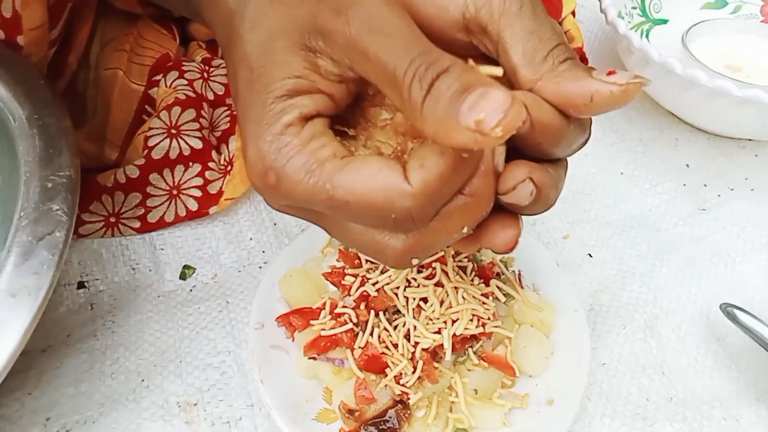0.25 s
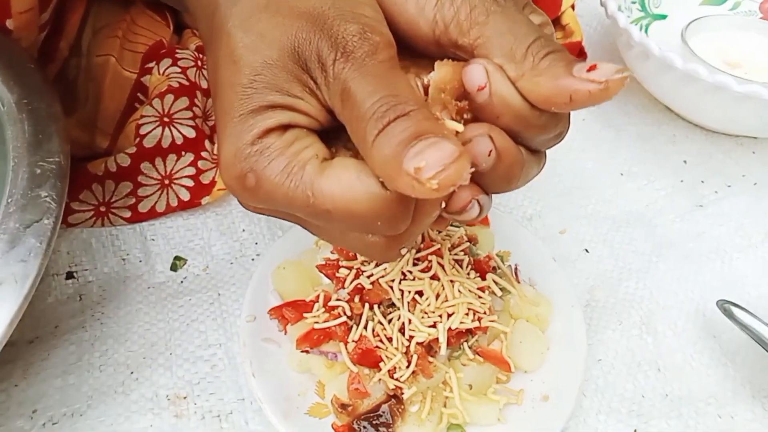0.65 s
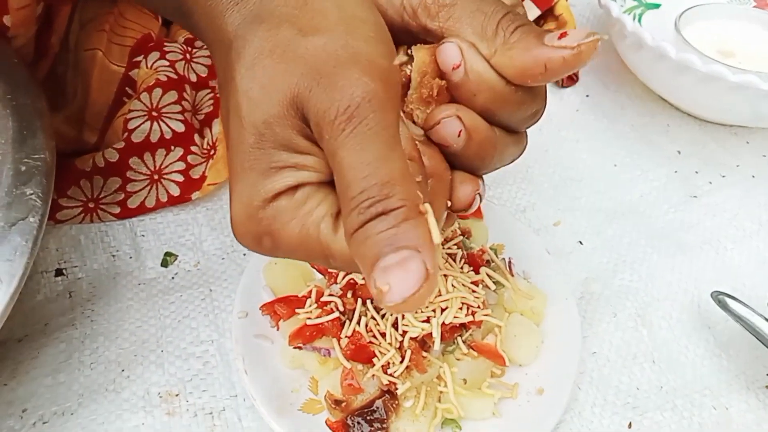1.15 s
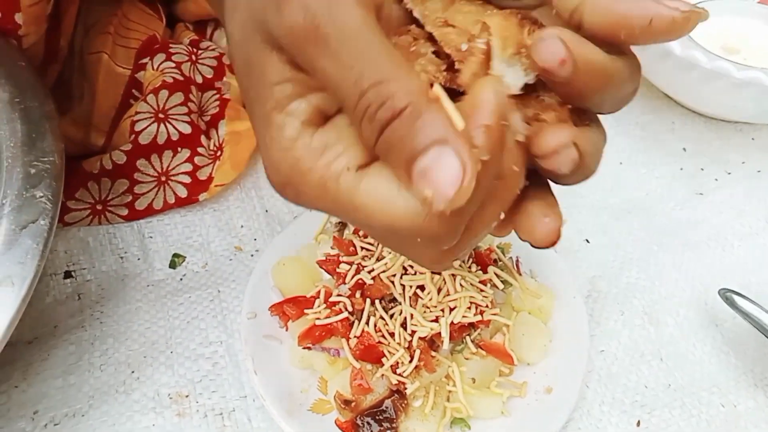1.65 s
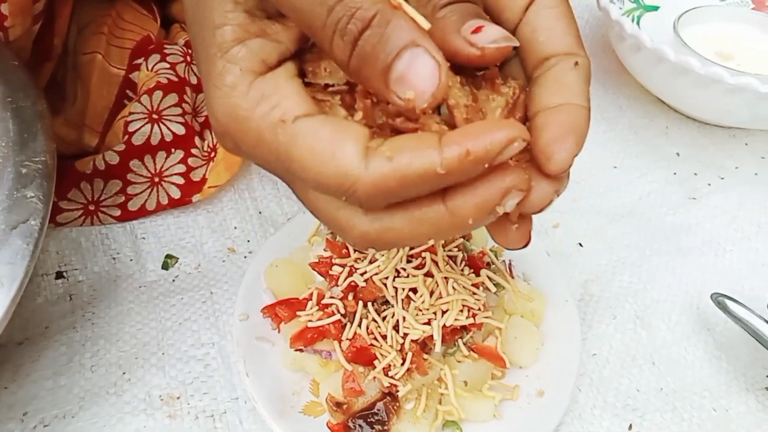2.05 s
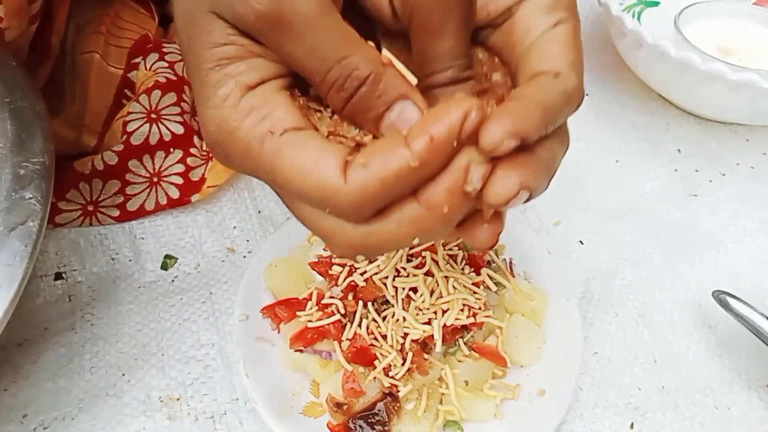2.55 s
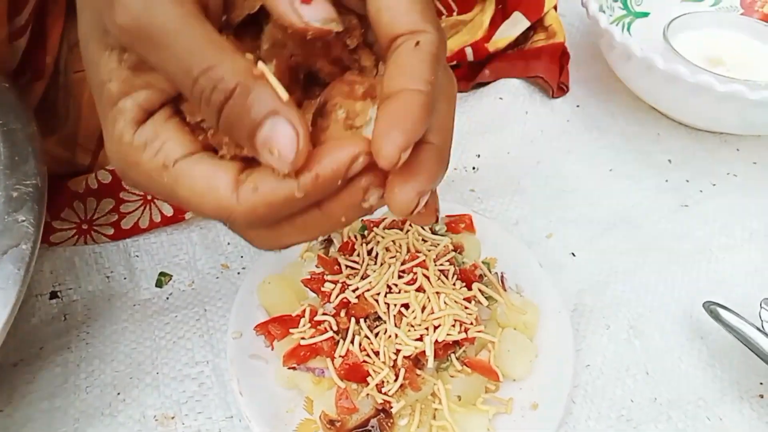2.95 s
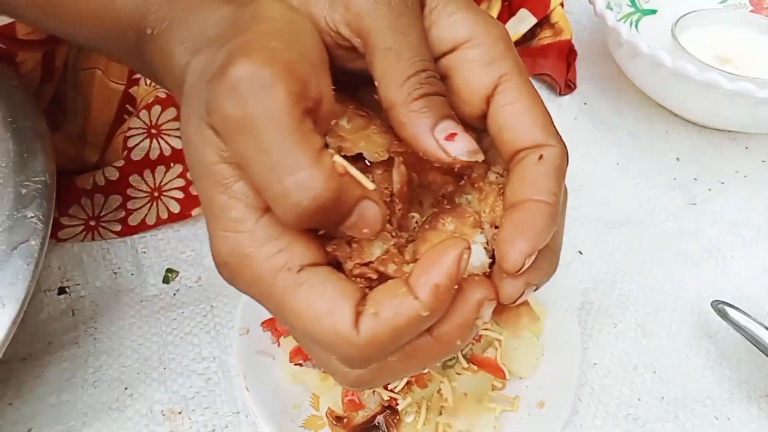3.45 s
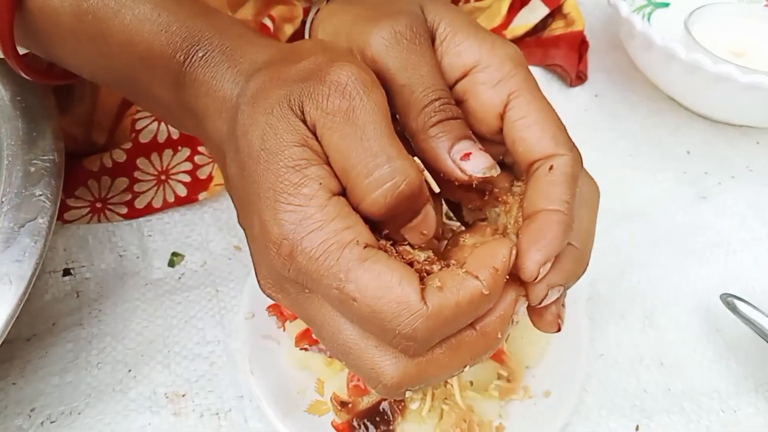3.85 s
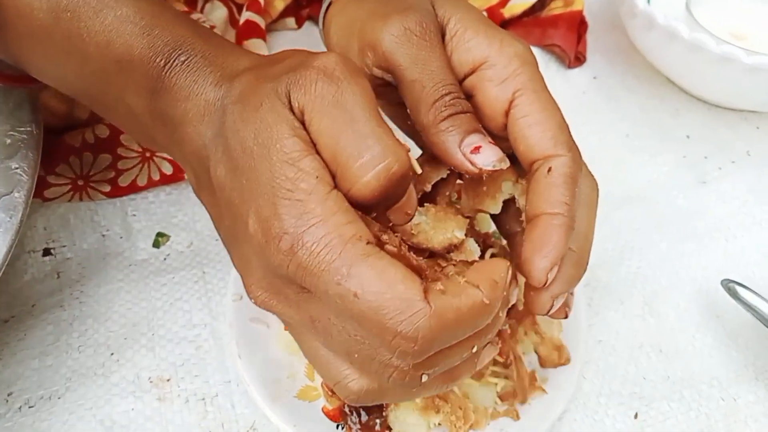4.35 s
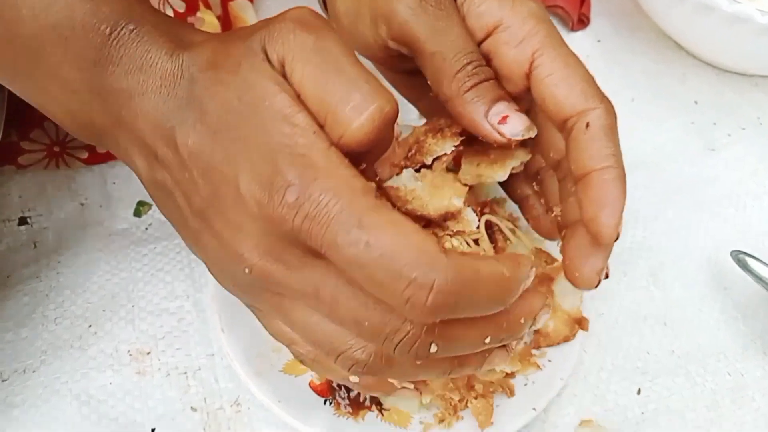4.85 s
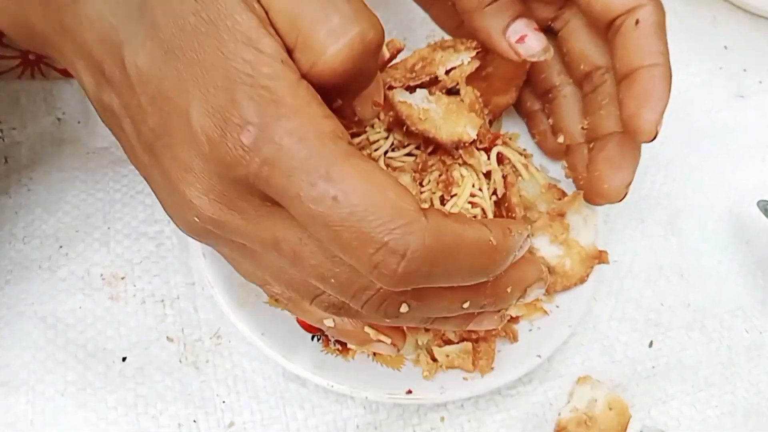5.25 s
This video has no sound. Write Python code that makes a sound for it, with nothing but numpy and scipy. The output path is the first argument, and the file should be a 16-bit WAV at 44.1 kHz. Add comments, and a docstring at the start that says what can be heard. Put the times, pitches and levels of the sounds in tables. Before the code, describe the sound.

Very close, dry crunching of thin fried crackers in cupped hands: clusters of sharp snaps over dense crumb crackle for under three seconds. Then near quiet, with light hard clinks, a few pieces dropping softly on food, and a bird whistling outside. Small quiet room, faint air noise.

```python
"""Crackers crushed by hand

Crisp fried crackers are crushed in cupped hands over a plate of food, close by in a small kitchen.
Each squeeze gives sharp cracks (noise bursts through shell, air and crust filters) over a dense crackle of
crumbs (random clicks that rattle and ring); then the pieces are let fall. A small hard thing,
likely a bangle, clinks as a sum of damped modes; a bird outside whistles gliding near-sines.
Room air and a far hum, both filtered noise, lie beneath."""
import sys
import numpy as np
from scipy import signal
from scipy.fft import rfft, irfft
from scipy.io import wavfile
from scipy.ndimage import uniform_filter1d

SR = 44100
rng = np.random.default_rng(int(sys.argv[2]) if len(sys.argv) > 2 else 0)


def waveform_to_disk(signal):
    """Save audio, clipped to [-1, 1], as 16-bit WAV at the path in sys.argv[1]."""
    frames = np.transpose(np.atleast_2d(signal))
    scaled = np.clip(frames, -1, 1) * 32767
    samples = np.round(scaled).astype(np.int16)
    wavfile.write(sys.argv[1], SR, samples)


N = 242991

# colour as the grip changes and the crumb pitch rises and falls, before each source's own offsets:
# t/s, hollow level/dB, fizz level/dB, sparkle level above 11.5 kHz/dB, crumb pitch f/Hz
GRIP = [(0, -10, -9.5, -4, 3976), (.5, -9, -10.5, 0.5, 3922), (1.35, -7, -13, -8, 3710),
        (1.63, -13.5, -18, 11, 3964), (1.902, -11.5, -8, -27.5, 4160), (2.3, -16.5, -7, -15, 4842),
        (3, -14.5, -12.5, 2.5, 5260), (3.8, -13.5, -11.5, -7, 5660), (4.6, -9, -12, 4, 3750),
        (5.5, -23.5, -13.5, -14, 4705)]
# the three voices of a fracture, air cupped in the hands, the thin shell, the splitting crust: f/Hz, level/dB
HOLLOW = [(60, -47), (200, -25), (450, -21.5), (650, -15.5), (810, -13.5), (1020, -9), (1420, 5.5),
          (1850, -1.5), (2230, 6), (2650, -3.5), (3400, -20)]
SHELL = [(1500, -46), (2600, -19.5), (3050, -1), (3500, 5.5), (4500, 0.5), (5600, 0.5), (6600, -3),
         (7600, -15), (11000, -50)]
FIZZ = [(4000, -26), (6800, 1.5), (7600, 3), (9300, 3), (12000, -3), (15500, -3.5)]


def cracks(snap=0.22, ragged_db=1.0, flake_width_hz=420, flake_ring=3.5, scatter=.16, rise_s=0.00021,
           run_up=0.37, run_up_t60=0.0092, hollow_db=-2.5, fizz_db=-2.0, size=2048, lead_size=256):
    """Brittle fracture: a crack creeps, snaps and runs on raggedly, exciting a few short modes of each flake."""
    # single cracks, loud and faint, falling pieces and hard ticks:
    # t/s, shell level/dB, hollow level re shell before the common offset/dB, t60/s
    crack_rows = [(0.0548, -29.5, -11.5, 0.041), (.078, -21.5, -12.5, 0.013), (.173, -39, -2, .008),
                  (0.2387, -41, 5.5, 0.058), (0.3884, -23, -19, 0.036), (0.3971, -24.5, -6.5, 0.008),
                  (0.4447, -23, -29, .008), (0.4711, -17, -25, 0.0056), (0.4879, -25, -16, 0.027),
                  (0.5089, -19, -17.5, 0.015), (.53, -20, -7.5, .025), (0.5929, -24.5, -7, .029),
                  (0.602, -18.5, -19, 0.012), (0.6112, -16.5, -9.5, 0.039), (0.6202, -25, -10, 0.017),
                  (.639, -15.5, -3.5, 0.013), (0.6863, -26, -7, 0.011), (.71, -28, -0.5, 0.013),
                  (0.7212, -20.5, -8.5, .021), (0.7297, -26, -7, 0.014), (0.7494, -18.5, -1.5, 0.015),
                  (.7779, -23, -5.5, 0.032), (.913, -25.5, -8, .013), (.9528, -21.5, -4, .022),
                  (1.0498, -15.5, -3.5, 0.0099), (1.1829, -29, -3, 0.036), (1.1918, -28, -3, 0.0053),
                  (1.227, -32.5, -4, .025), (1.2406, -24.5, -2, 0.067), (1.2982, -35.5, 7.5, 0.025),
                  (1.319, -30.5, -8, 0.017), (1.3592, -25, -3, 0.0082), (1.3699, -12, -3, 0.024),
                  (1.379, -17.5, -13, 0.025), (1.4249, -28.5, -7.5, 0.0074), (1.4674, -36.5, -16, 0.003),
                  (1.6061, -27, -5, 0.011), (1.6507, -19.5, -5.5, .024), (1.6696, -26.5, -6, 0.0089),
                  (1.7186, -36, -8, 0.014), (2.0843, -47.5, -35, 0.0082), (2.1808, -30, -24.5, 0.061),
                  (2.228, -21, -23.5, 0.012), (2.2676, -27, -24, 0.0064), (2.2812, -25.5, -22, 0.017),
                  (2.2925, -27, -17, .017), (2.3421, -23, -23, 0.011), (2.3602, -20, -13.5, 0.017),
                  (2.4029, -14.5, -25.5, 0.0077), (2.4465, -23, -18.5, 0.0098), (2.4527, -26.5, -16, .012),
                  (2.465, -21, -28, 0.046), (2.4816, -30, -20, 0.0095), (2.5038, -27, -17.5, 0.011),
                  (2.5426, -21.5, -16, 0.02), (2.5784, -28.5, -18, .034), (2.5891, -27, -25, 0.011),
                  (2.6501, -27.5, -11.5, 0.0057), (2.6674, -26.5, -9.5, 0.013), (2.69, -16, -14.5, 0.0066),
                  (2.72, -28.5, -9.5, 0.014), (2.805, -33.5, -32, 0.0048), (3.2194, -35, -13, 0.012),
                  (3.8818, -32.5, -16, 0.0031), (4.1889, -30.5, -29, 0.015), (4.025, -45, -28, 0.0075),
                  (4.5977, -47, -22, .013), (4.631, -45.5, -22, 0.018), (4.9042, -42, -4.5, 0.017),
                  (4.9094, -41, -10, 0.011), (5.132, -41.5, -7.5, 0.046), (5.1413, -29, -31, 0.036)]
    # flakes ring near the pitch of the crumbs; bigger ones sound hollower and lower
    flake_ratio, flake_octaves_per_db = 0.97, .009
    # hard cracks also thump the air in the hands, the more so the harder they are
    thump_hz, thump_width_hz, thump_db, hard_db, thump_growth = 765, 257, -19, -13, 1
    out = np.zeros(N)
    voices = [response(v) for v in (SHELL, HOLLOW, FIZZ)]
    grip = np.transpose(GRIP)
    span = np.sqrt(.007 * SR)   # a level of 0 dB stands for the energy of 7 ms at unit power
    opening = 1 - np.exp(-np.arange(size) / SR / rise_s)
    for s, db, hollow, t60 in crack_rows:
        fizz = np.interp(s, grip[0], grip[2])
        top = np.interp(s, grip[0], grip[3])
        hz = flake_ratio * np.interp(s, grip[0], grip[-1]) * 2 ** (-flake_octaves_per_db * hollow)

        # micro-fractures: a new random level every 32 samples
        ragged = from_db(ragged_db * np.repeat(rng.standard_normal(size // 32), 32))
        force = rms_one(dying_noise(t60, size) * ragged * opening) / np.sqrt(size)
        force[0] += snap * rng.choice([-1, 1])
        creep = run_up * dying_noise(run_up_t60, lead_size)[::-1]   # the crust begins to give just before it breaks
        fracture = np.concatenate([creep, force])

        shell, cavity, crust = [through(fracture, v) for v in voices]
        modes_hz = hz * np.exp(scatter * np.array([-1, 0, 2]) * (.5 + rng.random(size=3)))
        shell = shell + flake_ring * sum(resonance(shell, f, flake_width_hz) for f in modes_hz)
        sound = rms_one(shell) + from_db(hollow + hollow_db) * rms_one(cavity)
        sound = sound + from_db(fizz + fizz_db) * sparkle(crust, top)
        thump = rms_one(twice_resonant(cavity, thump_hz, thump_width_hz))
        sound = sound + from_db(hollow + thump_db + thump_growth * (db - hard_db)) * thump
        add(out, s - lead_size / SR, from_db(db) * span * sound / np.sqrt(len(sound)))
    return out


def crumbs():
    """Superposed crackling noise: dense fine crumbs and sparser coarse snaps, both driven by the squeezes."""
    fine_gain, coarse_gain = squeezing()
    # the fingers damp each crumb, so its ring stays broad
    fine = crackle(per_s=560, spread_db=2.5, grain_t60=0.013, crumb_ring=1.8, crumb_width_hz=320,
                   pitch_spread=.2, rub=0.15, even_s=0.044, shell_db=-1.5, hollow_db=-2.5, fizz_db=-1.0)
    coarse = crackle(per_s=130, spread_db=2.5, grain_t60=0.0088, crumb_ring=3.1, crumb_width_hz=610,
                     pitch_spread=.22, rub=0.14, even_s=.04, shell_db=0.5, hollow_db=-1.0, fizz_db=0.0)
    return fine_gain * fine + coarse_gain * coarse


def squeezing(tighten_db_per_s=465, relax_db_per_s=575):
    """Power addition: each squeeze tightens, holds and relaxes, giving gains of fine crumbs and coarse snaps."""
    # squeezes and rubs of the fingers:
    # start t/s, length/s, level halfway/dB, growth over the length/dB, power share of coarse snaps [0-1]
    squeezes = [(0, 0.07, -35, 5.5, 0.14), (0.093, 0.059, -41.5, 14, 0.73), (0.243, 0.012, -35, 2, .5),
                (0.36, 0.13, -31.5, 3.5, 0.11), (0.509, .185, -29.5, -4.5, 0.5),
                (0.768, 0.038, -30.5, -7, 0.36), (.918, .052, -27.5, -5.5, 0.63),
                (1.014, 0.077, -33, -4, 0.15), (1.124, 0.066, -33.5, -1, 0.64),
                (1.245, 0.041, -29, -2.5, 0.7), (1.32, 0.036, -41.5, 0, 0.3),
                (1.387, 0.025, -29.5, 1.5, .4), (1.595, 0.056, -23, 4, .3), (1.804, 0.082, -40, -7, 0.23),
                (1.929, 0.039, -46, 7, .3), (2.262, 0.12, -34, 1.5, 0.37), (2.42, .19, -36.5, -3.5, 0.91),
                (2.67, 0.031, -26.5, 3.5, 0.32), (2.774, 0.038, -39.5, -11, 0.65), (2.885, 0.07, -41, 6, 0),
                (3.011, 0.026, -46.5, 10.5, 0.06), (3.296, 0.015, -48, 9, 0), (3.44, 0.017, -50.5, 3, 0.34),
                (3.75, 0.12, -54.5, -11, 0.86), (4.946, 0.022, -53.5, -10, .5), (5.163, 0.035, -43, -6, 0),
                (5.336, 0.029, -46.5, 6, 0), (5.474, 0.031, -42.5, 9.5, 0.06)]
    # loose crumbs shifting between squeezes: t/s, level/dB
    loose = [(0, -61), (1.5, -47.5), (2.1, -54), (2.9, -51), (3.5, -57), (5.5, -59.5)]
    t = np.arange(N) / SR
    fine_power = from_db(in_time(loose)[0]) ** 2
    coarse_power = 0
    for s, length, db, growth_db, share in squeezes:
        hold = db + growth_db * (np.clip((t - s) / length, 0, 1) - .5)
        away = tighten_db_per_s * np.maximum(s - t, 0) + relax_db_per_s * np.maximum(t - s - length, 0)
        power = from_db(hold - np.minimum(away, 100)) ** 2
        fine_power = fine_power + (1 - share) * power
        coarse_power = coarse_power + share * power
    return np.sqrt(fine_power), np.sqrt(coarse_power)


def crackle(per_s, spread_db, grain_t60, crumb_ring, crumb_width_hz, pitch_spread, rub, even_s,
            shell_db, hollow_db, fizz_db, count=14):
    """Random impulse train: crumbs of many sizes and pitches break over a faint rub of crust on skin."""
    hollow, fizz, top, pitch = in_time(GRIP)
    breaks = rng.random(N) < per_s / SR
    sizes = from_db(spread_db * np.minimum(rng.exponential(1, N), 3))
    clicks = breaks * sizes * rng.choice([-1, 1], N)

    # deal every click to the kind of crumb nearest in pitch
    kinds_hz = np.geomspace(3100, 7000, count)
    borders_hz = np.sqrt(kinds_hz[1:] * kinds_hz[:-1])
    dealt = np.searchsorted(borders_hz, pitch * np.exp(pitch_spread * rng.standard_normal(N)))
    force = 0
    for k, hz in enumerate(kinds_hz):   # each kind of crumb has its own short rattle and ring
        rattle = dying_noise(grain_t60, size=600)
        rattle[0] += .4
        grain = rattle + crumb_ring * resonance(rattle, hz, crumb_width_hz)
        force = force + through(clicks * (dealt == k), grain)
    force = rms_one(force) + rub * rng.standard_normal(N)

    shell, cavity, crust = [rms_one(through(force, response(v))) for v in (SHELL, HOLLOW, FIZZ)]
    sound = from_db(shell_db) * shell + from_db(hollow + hollow_db) * cavity
    sound = sound + from_db(fizz + fizz_db) * sparkle(crust, top)
    # the fingers set how much energy is freed from moment to moment, so even out the running power
    power = uniform_filter1d(shell ** 2, int(even_s * SR)) + 1e-6
    return sound / np.sqrt(power)


def treble_side(x, window_s=0.016, gate_db=-36):
    """Mid-side stereo: a level-gated, randomly signed treble share of the crunch, added left, subtracted right."""
    # filter of the side signal: f/Hz, level/dB
    side_filter = [(3000, -60), (4000, -30), (5000, -15), (7500, -10), (12000, -11)]
    power = uniform_filter1d(x ** 2, int(window_s * SR))
    gate = power ** 2 / (power ** 2 + from_db(gate_db) ** 4)   # near 1 when loud
    random_sign = np.tanh(2 * drift(700))   # glides between -1 and 1
    return through(x * gate * random_sign, response(side_filter))


def bangle(contact_s=0.00015):
    """Modal synthesis: every touch rings the same damped modes with slightly new strengths."""
    # touches: t/s, level/dB
    clinks = [(3.8837, -23), (4.1899, -26), (4.246, -37), (4.6618, -28), (4.807, -35), (4.844, -46),
              (5.434, -38.5)]
    # modes: f/Hz, mean level re touch/dB, t60/s
    bangle_modes = [(1020, -35, 0.17), (2280, -15, 0.08), (3917, 1.5, 0.073), (3820, -43, 0.03),
                    (5890, 0, 0.02), (8380, -12.5, 0.021), (9900, -26, 0.043)]
    out = np.zeros(N)
    for s, db in clinks:
        for hz, mode_db, t60 in bangle_modes:
            add(out, s, ring(hz, db + mode_db + rng.standard_normal(), t60, contact_s))
    return out


def bumps(plop_t60=0.082):
    """Impact response: hands bump and crumbs ping as damped modes; soft pieces plop as resonant noise."""
    # soft bumps of the hands: t/s, level/dB, f/Hz
    hand_bumps = [(1.789, -58, 213), (1.895, -54, 125), (2.11, -50, 130), (2.177, -56, 180),
                  (2.621, -58, 101), (2.821, -55, 121)]
    # crumbs that ping on the plate: t/s, level/dB, f/Hz
    plate_pings = [(3.5, -42, 5200), (5.0108, -36, 2870), (5.01, -41.5, 6900)]
    # pieces landing on the food: t/s, peak level/dB, f/Hz
    food_plops = [(4.63, -60, 228), (4.902, -45.5, 229), (4.909, -42.5, 437), (5.136, -55, 281),
                  (5.145, -42, 624)]
    out = np.zeros(N)
    for s, db, hz in hand_bumps:
        add(out, s, ring(hz, db, t60=0.11, rise_s=0.0097))
    for s, db, hz in plate_pings:
        add(out, s, ring(hz, db, t60=0.032, rise_s=0.00043))
    for s, db, hz in food_plops:
        thud = twice_resonant(dying_noise(plop_t60, size=8192), hz, hz)   # as wide as its own pitch
        add(out, s, from_db(db) * thud / np.abs(thud).max())
    return out


def bird(waver=0.012, overtone_db=-26, taper=0.38):
    """Frequency modulation: gliding, wavering near-sines with a weak octave, thrown back by a wall outside."""
    # start t/s, length/s, level/dB, then glide f/Hz at the start, a third, two thirds and the end
    bird_notes = [(0.123, 0.069, -44, 2070, 2000, 1915, 1880),
                  (0.277, 0.055, -42.5, 2430, 2450, 2500, 2680), (.35, 0.046, -36, 1720, 1820, 1710, 1580),
                  (3.41, 0.033, -60, 2000, 2280, 2530, 2900), (3.615, 0.045, -56, 2920, 2790, 2870, 2750),
                  (3.649, 0.069, -38, 2650, 2540, 2310, 2080), (3.704, .017, -41, 2200, 2290, 2480, 2520),
                  (3.76, 0.058, -49.5, 5500, 6150, 6050, 5700),
                  (3.929, 0.11, -36.5, 1930, 1863, 1859, 1880),
                  (4.19, 0.081, -41.5, 1506, 1627, 1550, 1440), (4.24, 0.066, -58, 2950, 2920, 2780, 2550),
                  (4.262, 0.042, -53, 1420, 1410, 1440, 1520), (4.388, .106, -33.5, 2200, 1980, 2150, 1960),
                  (4.4, 0.075, -67, 7000, 7200, 7280, 7300), (4.535, 0.069, -60, 7000, 7000, 7140, 7300),
                  (4.79, 0.1, -58, 7400, 6550, 6060, 5950), (5.324, 0.057, -48, 3700, 3820, 4030, 4020),
                  (5.419, 0.041, -48, 3120, 3100, 3060, 3220), (5.462, 0.026, -61, 2160, 2350, 2450, 2520),
                  (5.477, 0.042, -56, 3400, 3020, 2700, 2450)]
    # every note swells, peaks at this share of its length and falls away
    peak_at, swell_db, fall_db = .65, 8, 4.5
    wall_echo_s, wall_echo_db = 0.062, -22
    out = np.zeros(N)
    wobble = 1 + waver * drift(300)
    for s, length, db, *pitches in bird_notes:
        u = np.linspace(0, 1, int(length * SR))
        hz = np.polyval(np.polyfit(np.linspace(0, 1, 4), pitches, 3), u)   # smooth cubic glide
        note_wobble = np.roll(wobble, -int(s * SR))[:len(u)]
        phase = 2 * np.pi * np.cumsum(hz * note_wobble) / SR
        tone = np.sin(phase) + from_db(overtone_db) * np.sin(2 * phase)
        shape_db = np.interp(u, [0, peak_at, 1], [-swell_db, 0, -fall_db])
        note = np.sqrt(2) * from_db(db + shape_db) * signal.windows.tukey(len(u), taper) * tone
        add(out, s, note)
        add(out, s + wall_echo_s, from_db(wall_echo_db) * note)
    return out


def background(air_db=-60, waver_db=-1.5, hum_hz=740, hum_width_hz=190, hum_waver_db=3.5):
    """Filtered noise: room air of slowly wavering level and a far, wavering narrow-band hum."""
    # spectrum of the room air: f/Hz, level/dB
    air_spectrum = [(20, -21), (42, -22), (65, 1.5), (110, 3), (200, -1), (400, -6.5), (800, -7.5),
                    (2500, -11.5), (3500, -5), (5300, -12), (7800, -14), (9500, -4), (12000, -20),
                    (16000, -24)]
    # a far hum from outside: t/s, level before its waver/dB
    far_hum = [(0, -103), (3.4, -77.5), (3.8, -64), (4.5, -70.5), (4.8, -73), (5.51, -74.5)]
    air = rms_one(through(rng.standard_normal(N), response(air_spectrum, size=8192)))
    hum = rms_one(twice_resonant(rng.standard_normal(N), hum_hz, hum_width_hz))
    air_gain = from_db(air_db + waver_db * drift(6))
    hum_gain = from_db(in_time(far_hum)[0] + hum_waver_db * drift(31))
    return air_gain * air + hum_gain * hum


def room(x, t60, wet_db, delay_s):
    """Exponential reverberant decay: diffuse reflections that arrive a little late."""
    # colour of the reflections: f/Hz, level/dB
    room_colour = [(100, 27.5), (1000, -4.5), (4000, -8.5), (8000, 11), (15000, -7)]
    tail = through(dying_noise(t60, size=22050), response(room_colour))
    late_tail = np.concatenate([np.zeros(int(delay_s * SR)), tail])
    return x + from_db(wet_db) * through(x, late_tail)


def sparkle(x, db, edge_hz=11500):
    """Shelving by a crossover: lift or dull the very top, then scale to unit power."""
    top = signal.sosfilt(signal.butter(2, edge_hz, "high", fs=SR, output="sos"), x)
    rest = signal.sosfilt(signal.butter(2, edge_hz, fs=SR, output="sos"), x)
    return rms_one(rest - from_db(db) * top)   # the two bands are in opposite phase


def ring(hz, db, t60, rise_s, size=8192):
    """Damped oscillation: one mode, set going by a contact that takes a moment."""
    t = np.arange(size) / SR
    contact = 1 - np.exp(-(t / rise_s) ** 2)
    return from_db(db - 60 * t / t60) * np.sin(2 * np.pi * hz * t) * contact


def resonance(x, hz, width_hz):
    """Two-pole resonator: one resonance with gain 1 on top."""
    r = np.exp(-np.pi * width_hz / SR)
    zeros = np.array([1, 0, -1]) * (1 - r * r) / 2
    poles = [1, -2 * r * np.cos(2 * np.pi * hz / SR), r * r]
    return signal.lfilter(zeros, poles, x)


def twice_resonant(x, hz, width_hz):
    """Resonators in cascade: the same resonance twice has steeper skirts."""
    return resonance(resonance(x, hz, width_hz), hz, width_hz)


def dying_noise(t60, size):
    """Exponential decay: noise that falls by 60 dB in t60, with unit energy."""
    decay = from_db(-60 * np.arange(size) / SR / t60)
    return rms_one(rng.standard_normal(size) * decay) / np.sqrt(size)


def response(spectrum, size=2048):
    """Minimum phase: causal impulse response of a spectrum, by folding its cepstrum."""
    hz, db = np.transpose(spectrum)
    grid = np.maximum(np.arange(size // 2 + 1) * SR / size, 1)
    cepstrum = irfft(np.log(from_db(np.interp(np.log(grid), np.log(hz), db))))
    cepstrum[1:size // 2] *= 2
    cepstrum[size // 2 + 1:] = 0
    return irfft(np.exp(rfft(cepstrum)))


def through(x, impulse):
    """Linear filtering: convolve a sound with an impulse response, keeping its length."""
    return signal.oaconvolve(x, impulse)[:len(x)]


def drift(rate):
    """Band-limited chance: straight lines join normal random knots, rate of them per second."""
    knots = rng.standard_normal(N // 20)
    return np.interp(np.arange(N) / SR * rate, np.arange(len(knots)), knots)


def in_time(rows):
    """Linear interpolation: each column of a curve at every sample."""
    s, *columns = np.transpose(rows)
    return [np.interp(np.arange(N) / SR, s, c) for c in columns]


def add(out, s, sound):
    """Superposition: mix a sound in at a time."""
    i = max(0, round(s * SR))
    out[i:i + len(sound)] += sound[:max(0, N - i)]


def from_db(db):
    """Logarithmic level: decibels to amplitude gain."""
    return 10 ** (np.asarray(db) / 20)


def rms_one(x):
    """Mean-square power: scale a sound to unit power."""
    return x / np.sqrt(np.mean(x ** 2) + 1e-20)


def scene():
    """Direct and reverberant sound: hands close by, the bird farther off with more reflections."""
    crunch = cracks() + crumbs()
    hands = room(crunch + bangle() + bumps(), t60=0.078, wet_db=-23.0, delay_s=.004)
    mid = hands + room(bird(), t60=0.28, wet_db=-9, delay_s=0.015) + background()
    side = treble_side(crunch)
    return np.array([mid + side, mid - side])


def record(dry, cutoff_hz=15800):
    """Clipping and low-pass filtering: peaks stop at full scale, then the top is cut."""
    low_pass = signal.ellip(10, .1, 80, cutoff_hz, fs=SR, output="sos")
    return signal.sosfilt(low_pass, np.clip(dry, -1, 1))


dry = scene()
out = record(dry)
waveform_to_disk(out)
```